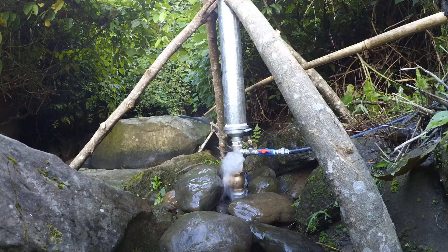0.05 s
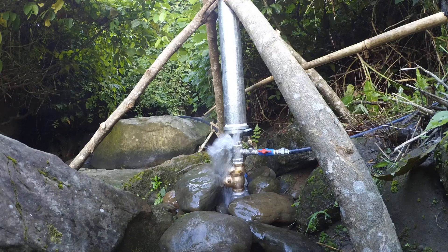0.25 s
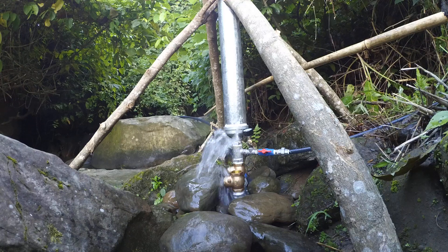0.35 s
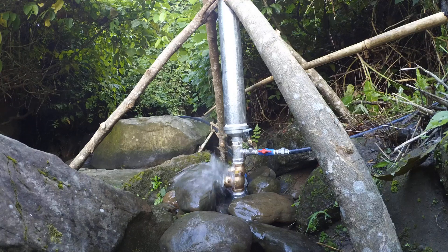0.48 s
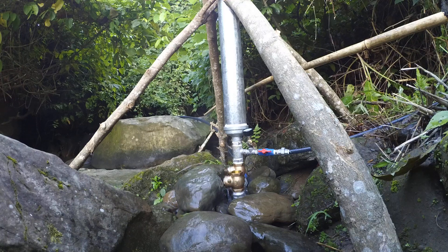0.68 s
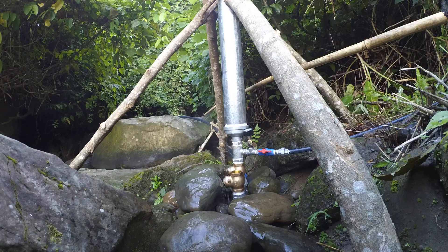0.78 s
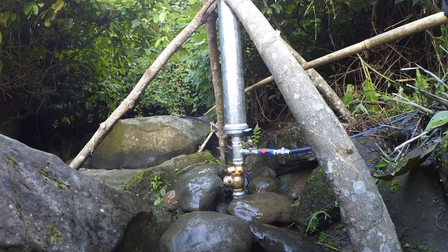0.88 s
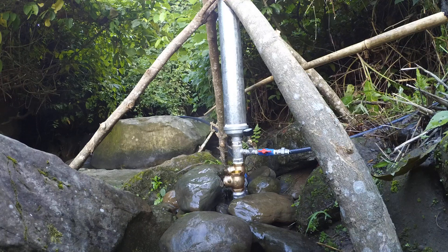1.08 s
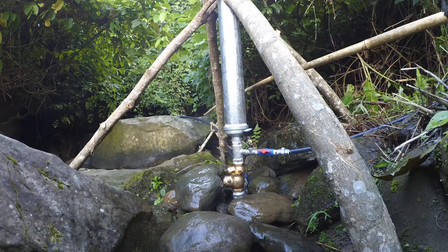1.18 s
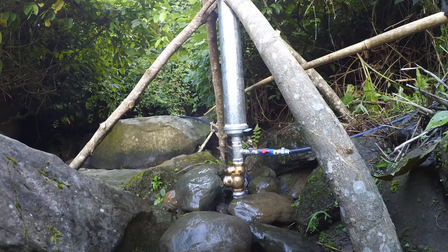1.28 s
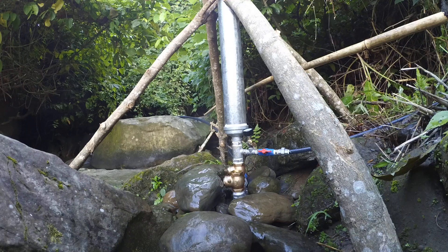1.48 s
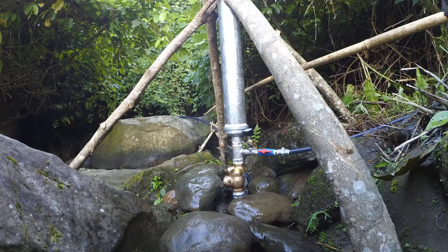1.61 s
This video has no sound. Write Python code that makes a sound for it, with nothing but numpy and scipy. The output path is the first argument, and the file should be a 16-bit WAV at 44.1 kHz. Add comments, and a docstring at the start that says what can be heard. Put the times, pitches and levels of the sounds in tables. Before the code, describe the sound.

A metal water pump valve spits water, then slams shut with a sharp clack and thump. Water splats on stones and the valve clinks open. Heard up close outdoors, with a stream gurgling softly behind.

```python
"""A ram pump in a rocky stream bed, heard close up through one microphone.
First its brass waste valve spits water; at 0.23 s it slams shut with a water-hammer thump.
Just after 0.5 s the last spurt falls on the stones with a splat.
At 0.9 s the valve drops open with a clink and bounces once.
Behind it all the stream gurgles, with a faint, thin whine above it."""
import sys
import numpy as np
from scipy import signal
from scipy.fft import rfft, irfft
from scipy.io import wavfile
from scipy.ndimage import uniform_filter1d

SR = 44100
rng = np.random.default_rng(int(sys.argv[2]) if len(sys.argv) > 2 else 0)


def generate_wav(sig):
    """Save sig (samples, or channels by samples) to the path in sys.argv[1] as 16-bit PCM at SR."""
    pcm = np.round(np.clip(np.atleast_2d(sig).T, -1, 1) * 32767).astype(np.int16)
    wavfile.write(sys.argv[1], SR, pcm)


N = 72765

# The valve hits its seat, close to the microphone: start_s, level_db, rise_s, hold_s, t60_s
SEAT_HITS = [(0.2275, -14, .001, 0.0033, 0.034)]
# Tone of the contact at the seat: frequency_hz, relative_db
SEAT_SPECTRUM = [(100, -19), (500, -6), (1000, -6), (1400, -7), (2200, -5), (2900, -1.5), (4400, -2),
                 (5300, -8.5), (8300, -7.5), (11500, -17), (15500, -23)]
# Water hammer inside the pipe: start_s, level_db, rise_s, hold_s, t60_s
HAMMER_THUMPS = [(0.2301, -21, 0.0018, 0.0035, 0.029)]
# Tone of that thump: frequency_hz, relative_db
HAMMER_SPECTRUM = [(25, -17), (90, -17), (180, 1.5), (320, -0.5), (400, -5), (500, -2.5), (700, 2),
                   (830, -9), (1050, -7.5), (1500, -16), (4000, -42)]


def valve_slam():
    """The valve shuts and rings, and the suddenly halted water thumps in the pipe."""
    out = np.zeros(N)
    for start_s, *burst in SEAT_HITS:
        add(out, start_s, chatter(SEAT_SPECTRUM, *burst) + metal_ring("seat"))
    for start_s, *burst in HAMMER_THUMPS:
        add(out, start_s, chatter(HAMMER_SPECTRUM, *burst))
    return out


# The valve drops on its stop: start_s, level_db, rise_s, hold_s, t60_s, ring_gain_db
STOP_HITS = [(0.9014, -24, .0005, .006, 0.034, -2.5), (0.9075, -24, 0.00089, 0.0031, 0.032, -1.5)]
# A faint rattle, then the second landing: start_s, level_db, rise_s, hold_s, t60_s
REBOUND_HITS = [(0.958, -47, 0.0036, 0.012, .04), (0.9788, -35, .002, .003, 0.055)]
# Tone of the contact at the stop: frequency_hz, relative_db
STOP_SPECTRUM = [(100, -20), (450, -6.5), (750, -3), (1600, 2), (2200, -8.5), (2850, -0.5), (3300, -3.5),
                 (3800, 0.5), (4500, -1.5), (6300, -10.5), (8000, -10), (11500, -17), (15500, -24)]


def valve_drop():
    """The valve falls open, clinks on its stop and bounces once."""
    out = np.zeros(N)
    for start_s, *burst, ring_gain_db in STOP_HITS:
        add(out, start_s, chatter(STOP_SPECTRUM, *burst) + metal_ring("stop", ring_gain_db))
    landing_db = REBOUND_HITS[-1][1]
    for start_s, level_db, *envelope in REBOUND_HITS:
        contact = chatter(STOP_SPECTRUM, level_db, *envelope)
        add(out, start_s, contact + metal_ring("rebound", level_db - landing_db))
    return out


# Valve and pipe ringing, up close: pitch_hz, t60_s, seat_db, stop_db, rebound_db
METAL_MODES = [(420, 0.1, -35, -43, -34.5), (504.5, 0.041, -17, -48, -45), (685, 0.048, -17, -36, -55),
               (975, .14, -29, -48, -48), (1096, 0.077, -22, -36, -40), (1220, 0.06, -46, -41, -33.5),
               (1440, 0.057, -42, -31.5, -42), (2250, 0.099, -39, -53, -58),
               (2828, 0.036, -22, -27.5, -26.5), (3100, 0.11, -27, -46, -53), (3292, 0.12, -25.5, -42, -55),
               (3774, 0.062, -27, -29, -37), (3960, 0.075, -25, -24.5, -34), (4385, 0.079, -21, -40, -42),
               (4515, 0.12, -27.5, -36, -57), (7660, 0.094, -36, -35, -60), (8070, .04, -35, -26.5, -57),
               (10400, 0.058, -48, -29, -55), (10510, .07, -48, -31.5, -55)]


def metal_ring(strike, gain_db=0, rise_s=0.0014, flutter_rad=0.4, flutter_hz=90):
    """Each kind of strike sets the modes ringing in its own balance; they flutter as they die."""
    t, out = seconds(), 0
    lowpass = signal.butter(2, flutter_hz, fs=SR)
    for pitch_hz, t60_s, seat_db, stop_db, rebound_db in METAL_MODES:
        level_db = {"seat": seat_db, "stop": stop_db, "rebound": rebound_db}[strike] + gain_db
        flutter = unit(signal.lfilter(*lowpass, rng.standard_normal(len(t))))
        phase = 2 * np.pi * (pitch_hz * t + rng.random()) + flutter_rad * flutter
        out += amp(level_db - 60 * t / t60_s) * np.sin(phase)
    return np.minimum(t / rise_s, 1) * out


# Spray on the stones around the pump: time_s, level_db
SPRAY_LEVELS = [(0, -45.5), (.07, -45), (.1, -42.5), (.15, -51.5), (.22, -44.5), (.27, -40.5), (.306, -45),
                (.34, -37.5), (.365, -46.5), (.41, -49.5), (.45, -46.5), (.49, -51), (.54, -45),
                (.6, -45.5), (.65, -45.5), (.72, -52), (.85, -57), (1.65, -69)]
# Tone of the spray at the microphone: frequency_hz, relative_db
SPRAY_SPECTRUM = [(200, -12), (450, 0), (700, -3.5), (1400, 0.5), (2000, -1), (2700, -3), (4000, -3),
                  (6500, -5.5), (10000, -10), (15500, -19)]


def spray():
    """Water spat from the valve: pattering drops, a hiss of mist and tiny bubbles."""
    patter = droplets(per_s=3200, spread_db=3.5, decay_cycles=1.7)
    mist = 0.61 * rng.standard_normal(N)
    bubbles = 0.81 * droplets(per_s=700, spread_db=3, decay_cycles=9.2)
    level_db = np.interp(seconds(N), *np.transpose(SPRAY_LEVELS))
    return amp(level_db) * colour(patter + mist + bubbles, SPRAY_SPECTRUM)


# Water lands on the stones beside the pump: start_s, level_db, rise_s, hold_s, t60_s
STONE_SPLATS = [(0.09, -41, 0.0034, 0.0075, 0.043), (0.190, -42.5, .003, 0.0087, .04),
                (0.29, -43, .002, .003, .03), (0.5428, -32, 0.0046, 0.0084, 0.058),
                (0.571, -31.5, 0.00091, 0.0094, 0.052), (0.63, -44, .002, 0.0086, .04),
                (0.687, -48.5, .002, .009, .03)]
# Tone of a splat: frequency_hz, relative_db
SPLAT_SPECTRUM = [(200, -19), (900, -10), (1600, -6.5), (2600, -3), (4400, 0.5), (6500, -4.5), (9000, -9.5),
                  (15500, -25)]
# Air pockets in the nearby water: start_s, pitch_hz, level_db, t60_s
AIR_POCKETS = [(0.095, 3550, -31.5, .02), (0.098, 2740, -33, .02), (0.326, 1360, -37, 0.027),
               (0.337, 1660, -31, 0.026), (0.345, 1936, -31, .03), (0.381, 1380, -36.5, 0.032),
               (0.5125, 1890, -31, 0.016), (0.517, 1930, -27.5, .018), (0.520, 3170, -34.5, .018),
               (0.547, 1470, -30, 0.021), (0.548, 1910, -28.5, 0.031), (0.572, 375, -24.5, 0.047),
               (0.5725, 468, -24.5, .035), (0.573, 815, -25.5, 0.034), (0.5737, 1133, -23, 0.063),
               (0.574, 1347, -25, 0.032), (0.591, 169, -33.5, 0.21), (0.669, 1870, -34.5, 0.019)]


def splashes():
    """Larger lumps of water splat on stone and trap air, which rings."""
    out = np.zeros(N)
    for start_s, *burst in STONE_SPLATS:
        add(out, start_s, chatter(SPLAT_SPECTRUM, *burst))
    for start_s, pitch_hz, level_db, t60_s in AIR_POCKETS:
        add(out, start_s, amp(level_db) * bubble(pitch_hz, t60_s))
    return out


# The stream behind the pump: frequency_hz, relative_db
STREAM_SPECTRUM = [(15, -31), (25, -24), (50, -18), (90, -17), (122, -18), (160, -3), (240, -5.5),
                   (310, -12), (375, -17), (440, -11.5), (530, -18), (680, -24), (820, -22), (980, -14),
                   (1180, -21), (1600, -17.5), (2200, -22), (4400, -23.5), (5700, -26), (9500, -32),
                   (15500, -42.5)]


def stream(level_db=-44, patch_depth_db=1.37):
    """A patchy wash of flowing water with fine trickles in it."""
    noise = signal.stft(rng.standard_normal(N), nperseg=512)[2]
    patches = uniform_filter1d(rng.standard_normal(noise.shape), size=6, axis=0)  # smooth in frequency
    patches = unit(uniform_filter1d(patches, size=9, axis=1))  # and in time
    wash = unit(signal.istft(noise * amp(patch_depth_db * patches), nperseg=512)[1][:N])
    trickles = 0.51 * droplets(per_s=3000, spread_db=3, decay_cycles=2.8)
    return amp(level_db) * colour(wash + trickles, STREAM_SPECTRUM)


def gurgle(level_db=-50, count=72, per_s=45, centre_hz=187.4, spread_octaves=0.29, spread_db=5.1):
    """Large bubbles glug between the boulders."""
    out = np.zeros(N)
    for slot, (jitter, detune, size) in enumerate(rng.uniform(-0.999, 1, (count, 3))):
        glug = bubble(centre_hz * 2 ** (spread_octaves * detune), t60_s=0.11)
        add(out, (slot + jitter) / per_s, amp(spread_db * size) * glug)
    return amp(level_db) * unit(out)


# A thin whine in the background: pitch_hz, width_hz, level_db
WHINE_BANDS = [(4785, 70, -62), (5390, 80, -64.5)]


def whine():
    """Two faint, narrow bands of noise, pitched high above the gurgle."""
    hz, out = np.fft.rfftfreq(N, 1 / SR), 0
    for pitch_hz, width_hz, level_db in WHINE_BANDS:
        band = rfft(rng.standard_normal(N)) / (1 + (2 * (hz - pitch_hz) / width_hz) ** 2)
        out += amp(level_db) * unit(irfft(band, N))
    return out


# Echo of the boulders around the microphone: frequency_hz, t60_s
ROCK_DECAY = [(100, 0.27), (500, .12), (1200, 0.11), (4000, 0.18), (9000, 0.16), (15000, 0.11)]


def rock_echo(sound, gain_db=-12.5, delay_s=0.006):
    """Nearby boulders throw back a short scatter of echoes."""
    hz, t, noise = signal.stft(rng.standard_normal(SR // 2), SR, nperseg=256)
    decay = amp(-60 * t / curve_at(ROCK_DECAY, hz)[:, None])
    tail = signal.istft(noise * decay, SR, nperseg=256)[1]
    out = np.zeros(N)
    add(out, delay_s, signal.fftconvolve(sound, tail / np.linalg.norm(tail)))
    return amp(gain_db) * out


def chatter(spectrum, level_db, rise_s, hold_s, t60_s):
    """A dense burst of tiny contacts that swells, holds and dies."""
    t = seconds()
    contacts = colour(rng.choice([-1., 1.], len(t)), spectrum)
    decay_db = 60 * np.maximum(t - rise_s - hold_s, 0) / t60_s
    return contacts * np.minimum(t / rise_s, 1) * amp(level_db - decay_db)


def bubble(pitch_hz, t60_s, rise_s=0.00087, glide_per_s=1.2):
    """Trapped air rings with a dying tone that rises a little in pitch."""
    t = seconds()
    phase = 2 * np.pi * pitch_hz * (t + glide_per_s * t ** 2 / 2)
    return np.minimum(t / rise_s, 1) * amp(-60 * t / t60_s) * np.sin(phase)


def droplets(per_s, spread_db, decay_cycles, pitches=36):
    """Random drops of all sizes and pitches, each ringing a few cycles."""
    t, out = seconds(1500), np.zeros(N)
    for hz in np.geomspace(700, 15000, pitches):
        sizes = amp(spread_db * np.minimum(rng.exponential(1, N), 4))
        landings = rng.random(N) < per_s / pitches / SR
        drop = np.exp(-hz * t / decay_cycles) * np.sin(2 * np.pi * hz * t)
        out += np.sqrt(hz) * unit(signal.oaconvolve(sizes * landings, drop)[:N])
    return unit(out)


def amp(db):
    """Decibels to gain."""
    return 10 ** (np.asarray(db) / 20)


def unit(x):
    """Scales to rms 1."""
    return x / np.sqrt(np.mean(x ** 2) + 1e-20)


def curve_at(points, hz):
    """Interpolates on a log-frequency axis."""
    point_hz, values = np.transpose(points)
    return np.interp(np.log(hz + 1), np.log(point_hz + 1), values)


def colour(x, spectrum):
    """Gives a signal a spectrum, at rms 1."""
    gains = amp(curve_at(spectrum, np.fft.rfftfreq(len(x), 1 / SR)))
    return unit(irfft(rfft(x) * gains, len(x)))


def add(mix, start_s, sound):
    """Mixes a sound in at start_s."""
    part = mix[max(round(start_s * SR), 0):][:len(sound)]
    part += sound[:len(part)]


def seconds(samples=12000):
    """Time axis of one sound."""
    return np.arange(samples) / SR


def scene():
    """The pump in front, the stream behind, alike in both channels."""
    pump = valve_slam() + valve_drop() + spray() + splashes()
    mono = pump + rock_echo(pump) + stream() + gurgle() + whine()
    return np.array([mono, mono])


def record(dry):
    """The microphone takes in sound up to 15.6 kHz."""
    lowpass = signal.firwin(511, 15600, window=("kaiser", 9), fs=SR)
    return signal.oaconvolve(dry, lowpass[None], "same")


dry = scene()
out = record(dry)
generate_wav(out)
```